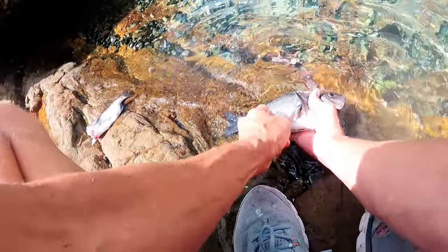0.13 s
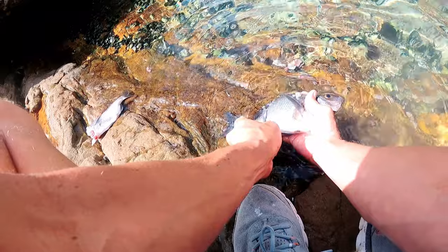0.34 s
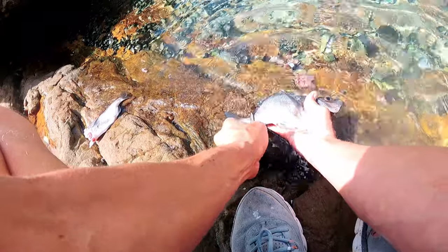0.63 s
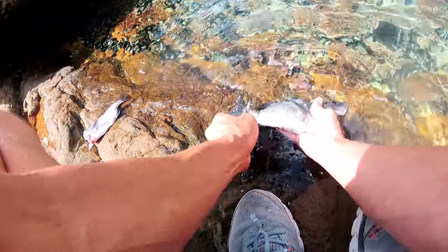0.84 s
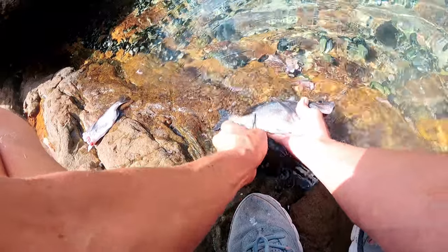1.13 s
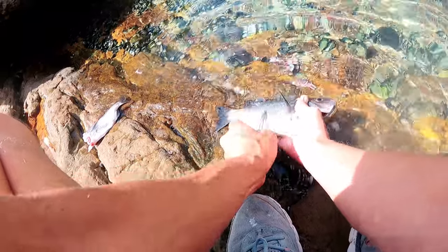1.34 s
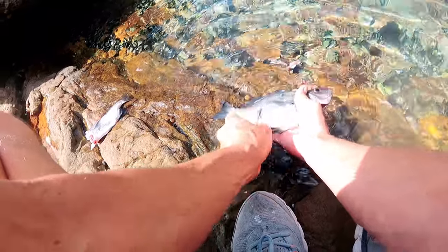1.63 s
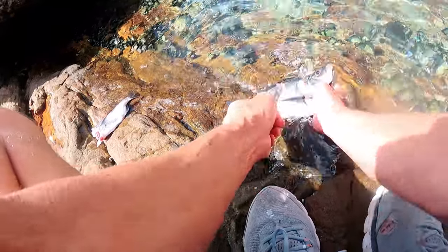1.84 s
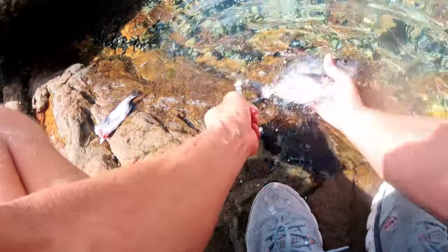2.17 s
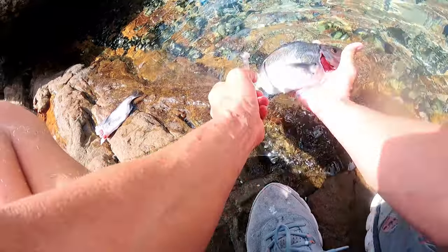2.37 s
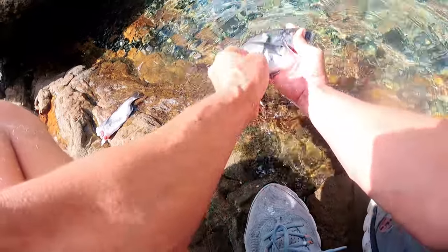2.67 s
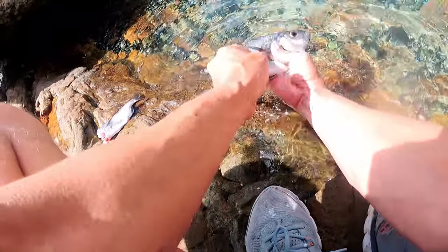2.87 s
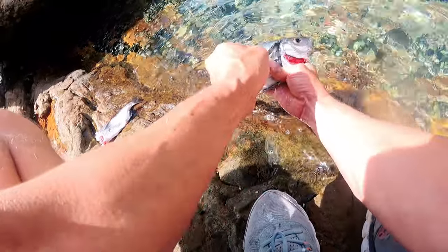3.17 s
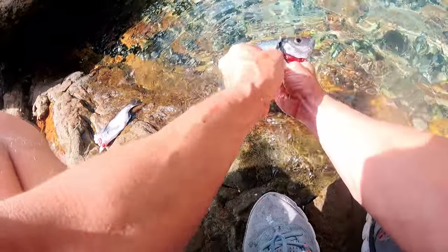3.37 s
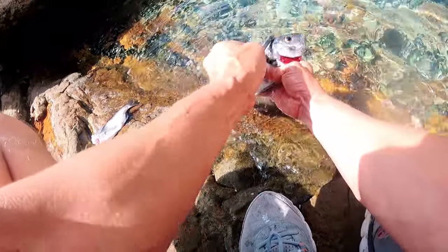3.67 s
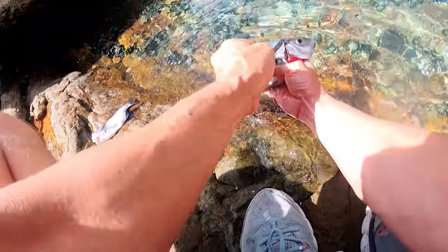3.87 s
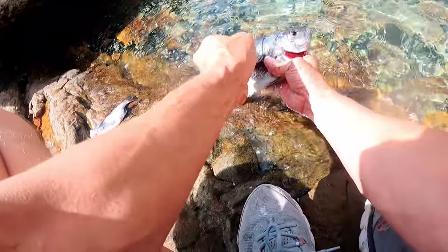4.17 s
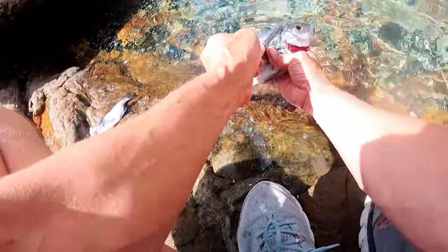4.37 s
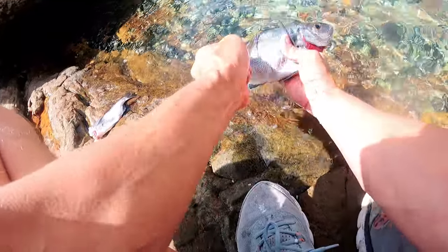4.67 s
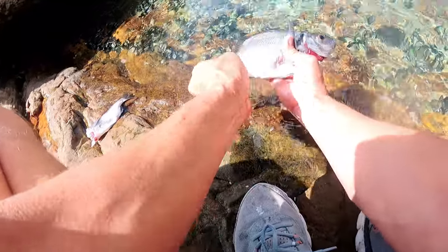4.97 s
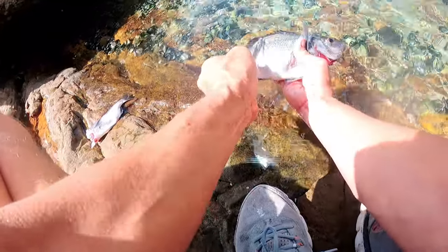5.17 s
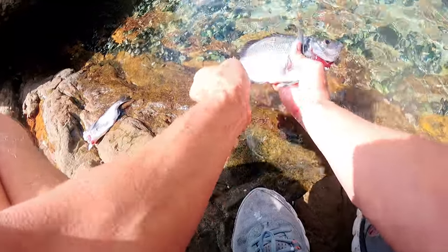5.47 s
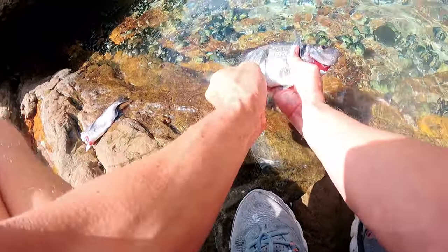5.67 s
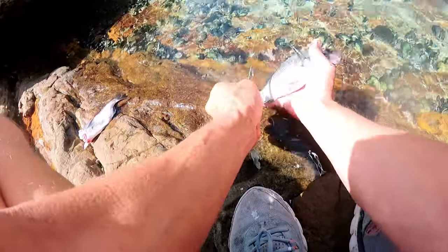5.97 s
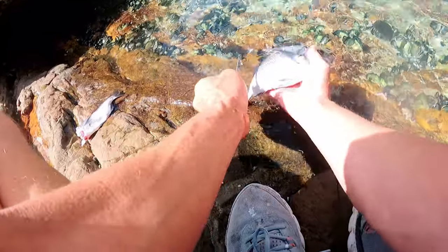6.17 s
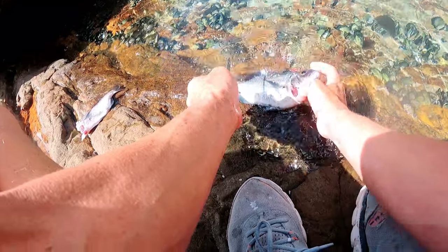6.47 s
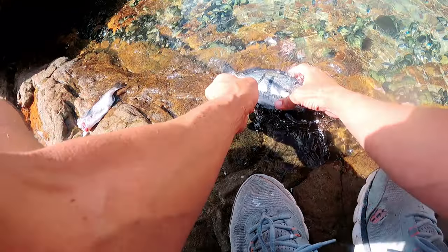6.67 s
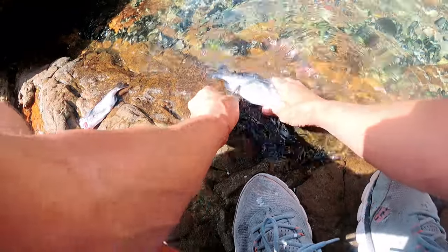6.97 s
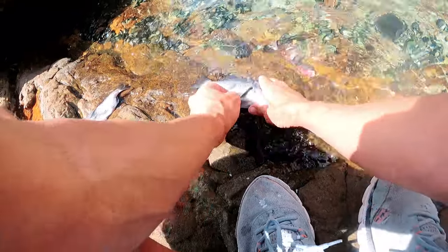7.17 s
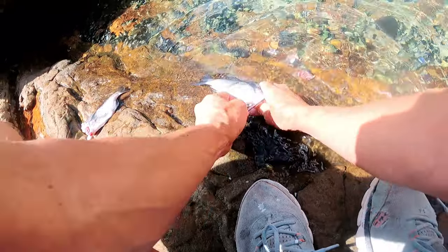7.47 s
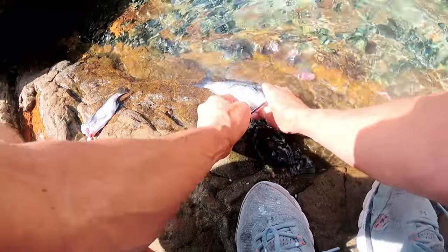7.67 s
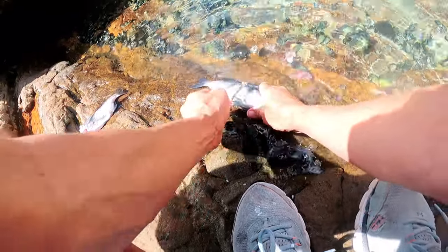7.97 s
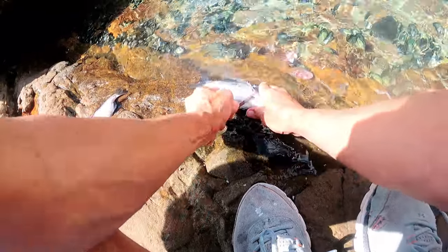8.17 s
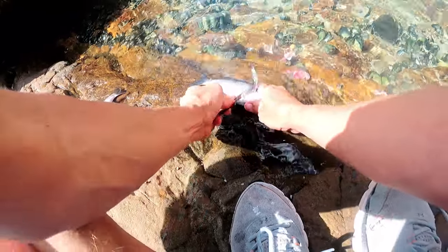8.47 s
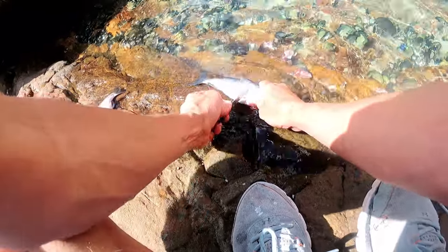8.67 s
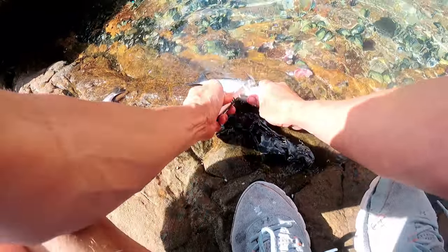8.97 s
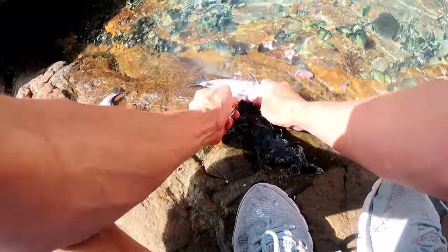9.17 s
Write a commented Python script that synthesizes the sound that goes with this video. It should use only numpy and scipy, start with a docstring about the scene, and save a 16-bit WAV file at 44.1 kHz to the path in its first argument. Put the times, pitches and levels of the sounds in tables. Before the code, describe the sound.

From the start, a small knife scrapes scales off a fish close to the microphone, about four strokes a second. Each stroke is a crackly rasp of tiny snaps, and single scales flick off with sharp ticks. At about 2 seconds the fish is rinsed in the sea, slightly to the right, with a sharp smack, splashing, ringing bubbles and thinning drips. Scraping resumes from 3 to 6 seconds. Around 6.5 seconds comes a second, louder splash with sloshing, plops and drops, then a dull low thump just after 7. From about 7.4 seconds to the end, just past 9, the strokes are softer and wetter, down at the water, with one tiny squeak, and the sound narrows toward the centre. Throughout, the sea washes and trickles softly among shore rocks, while low rumble and occasional wind puffs buffet the microphone.

```python
"""A small knife scrapes the scales off a fish, about four strokes a second, close to the microphone.
Each stroke is a run of tiny snaps that ring in blade and fish; single scales flick off.
The fish is rinsed twice in the sea, a little to the right (splash, slosh, drips, ringing bubbles),
then scraped low at the water, where the stereo image narrows. Behind it the sea washes a rocky shore,
and a low rumble and puffs of wind lie on the microphone's two ports."""
import sys
import numpy as np
from scipy import signal
from scipy.fft import rfft, irfft, next_fast_len
from scipy.io import wavfile

SR = 44100
rng = np.random.default_rng(int(sys.argv[2]) if len(sys.argv) > 2 else 0)


def put_to_file(sound):
    """Save the sound as 16-bit audio at rate SR, in the file named by the first command-line argument."""
    columns = np.atleast_2d(sound).T  # one column per channel
    safe = np.clip(columns, -1, 1)
    whole_steps = np.round(safe * 32767)
    wavfile.write(sys.argv[1], SR, whole_steps.astype(np.int16))


N = 410571
TIME = np.arange(N) / SR


# knife strokes, close in front, timed at the hardest bite: bite_s, level_db, ring_db, rise_s, fall_s
STROKES = [(0.018, -40.5, -43.5, 0.062, 0.054), (0.258, -38, -41.5, 0.018, 0.066),
           (0.303, -50, -44, 0.013, 0.022), (0.51, -48, -47, .016, .02), (0.549, -36.5, -37, 0.023, 0.04),
           (0.778, -41.5, -34.5, 0.013, 0.0092), (0.92, -43.5, -51, 0.062, 0.0054),
           (1.116, -36, -40, 0.038, 0.02), (1.358, -36, -41, 0.022, 0.059),
           (1.639, -40.5, -37, 0.036, 0.0062), (1.875, -44.5, -53, 0.04, 0.049),
           (3.069, -44, -50, 0.063, 0.0037), (3.286, -36.5, -50, 0.05, 0.016),
           (3.482, -35.5, -52, 0.018, 0.03), (3.602, -44.5, -67, 0.014, 0.022),
           (3.74, -35.5, -58, 0.026, 0.0094), (3.999, -38.5, -50, 0.036, 0.053),
           (4.225, -37, -45, 0.021, 0.045), (4.462, -38.5, -47, 0.021, 0.041),
           (4.736, -39, -44, 0.035, 0.0052), (4.762, -28, -30.5, 0.0055, 0.0058),
           (4.849, -46.5, -44, 0.0068, .006), (4.973, -31.5, -30, 0.017, 0.0094),
           (5.243, -38.5, -43, 0.023, 0.018), (5.475, -40, -46.5, 0.027, .012),
           (5.7, -42, -55, 0.016, 0.06), (5.956, -55, -54, 0.014, 0.026), (7.422, -42, -48, 0.0056, 0.0035),
           (7.589, -44.5, -39.5, 0.033, 0.021), (7.833, -47.5, -47.5, 0.058, 0.025),
           (7.987, -53, -50.5, 0.02, 0.031), (8.042, -49, -50, 0.0089, 0.018),
           (8.319, -49, -44.5, 0.022, 0.054), (8.595, -49.5, -42, 0.051, 0.054),
           (8.826, -47.5, -46, 0.043, 0.048), (9.074, -46, -44, 0.035, 0.042),
           (9.296, -53, -50.5, 0.009, .087)]
# colour of the snapping scales, fish held up or lying in the water: frequency_hz, held_db, lowered_db
RASP_COLOUR = [(300, 4.5, 16.5), (960, 10.5, 13), (2380, 1.5, -42), (2870, 5, 14.5), (3420, 1, 1),
               (4500, 5, -2), (6850, -1, -4), (7660, 1.5, 9), (8100, -2.5, 5), (9000, 2, -4),
               (10400, -3.5, 0.5), (11900, -5, -2), (14200, -12, -2), (15700, -18, -19)]
# resonances of flesh, then knife, with the fish held up: pitch_hz, width_hz
HELD_BODY = [(1100, 2800), (4150, 640)]
# the same two, lower once the fish lies in the water: pitch_hz, width_hz
LOWERED_BODY = [(650, 640), (3600, 3800)]
# each grip gives the belly another hollow ring: flesh_db, knife_db, belly_db, belly_hz, belly_width_hz
GRIPS = [(-13, -23, 0.5, 2000, 520), (-19, -9, 2, 2050, 290), (-4, -6.5, 3, 2050, 280),
         (-11, 5.5, -1, 1730, 160), (-5, 0, -4, 1090, 250), (-31, 2, -4, 2850, 400),
         (-12, -0.5, -9, 2200, 1000), (-15, -2, -5, 2300, 1300), (-5, -2, -0.5, 2160, 1500)]
# when each grip begins: start_s
GRIP_STARTS = (-1, .7, 1.5, 2.5, 4.6, 5.1, 7.2, 8.2, 8.95)
LOWERED_S = 7.2  # from here on the fish lies in the water

def scrape(snaps_per_s=2100, catches_per_s=130, spread_db=1.7, slip_db=3.0, rasp_db=3.0, body_db=-1,
           catch_db=-3, crunch_db=-3, push_db=-5, belly_fade_s=0.029, detune_octaves=0.06, apart=0.3):
    """The blade trips over rows of scales: uneven runs of snaps, heard directly and through the body."""
    out, t = np.zeros((2, N)), np.arange(-SR // 5, SR // 5) / SR
    for s, db, ring_db, rise, fall in STROKES:
        lowered = s > LOWERED_S
        flesh_db, knife_db, belly_db, *belly = GRIPS[np.searchsorted(GRIP_STARTS, s) - 1]
        force = swell(t, rise, fall)
        bite = force * amp(slip_db * wander(len(t), 255.5))
        catches = amp(catch_db) * crackle(len(t), catches_per_s, spread_db)  # stiff scales snap hard
        snaps = crackle(len(t), snaps_per_s, spread_db)
        drive = bite * (snaps + catches + .2 * rng.standard_normal(len(t)))
        # each scale that tears loose rings briefly at a pitch of its own
        crunch = unit(bite * patter(1900, 6000, 14500, cycles=22, spread_db=3, size=len(t)))
        rasp = [(hz, low if lowered else held) for hz, held, low in RASP_COLOUR]
        sound = amp(db + rasp_db) * colour(unit(drive) + amp(crunch_db) * crunch, rasp)
        # the belly rings as the blade digs in and fades soon after the hardest bite
        digging = (drive + bite * rng.standard_normal(len(t))) * np.exp(-np.maximum(t, 0) / belly_fade_s)
        sound += amp(ring_db + belly_db) * unit(resonate(digging, *belly))
        for (hz, width), share_db in zip(LOWERED_BODY if lowered else HELD_BODY, (flesh_db, knife_db)):
            detuned_hz = hz * 2 ** (detune_octaves * rng.uniform(-1, 1))  # no two grips are quite alike
            sound += amp(ring_db + body_db + share_db) * unit(resonate(drive, detuned_hz, width))
        sound += amp(db + push_db) * unit(resonate(drive, hz=390, width_hz=280))  # the flesh gives
        scatter = apart * amp(db) * colour(bite * crackle(len(t), snaps_per_s, spread_db), rasp)
        for channel, sign in zip(out, (1, -1)):
            add(channel, s + t[0], np.sqrt(np.mean(force ** 2)) * (sound + sign * scatter))
    return out


# single scales flicking off the blade: start_s, level_db, pitch_hz
SCALE_FLICKS = [(0.0623, -24.5, 8960), (0.074, -26.5, 4300), (0.2523, -22, 7200), (0.275, -25, 8900),
                (0.533, -24, 8500), (0.5427, -12.5, 8840), (0.5794, -19, 6400), (0.6635, -30, 8900),
                (0.826, -35, 9000), (0.889, -42, 9000), (0.9178, -27, 6650), (0.9747, -35, 7000),
                (1.0783, -14.5, 7300), (1.104, -14, 8400), (1.119, -13.5, 9930), (1.129, -23, 11000),
                (1.3508, -15, 9700), (1.3848, -24, 4230), (1.3617, -12, 9270), (1.4015, -18, 4840),
                (1.408, -17, 4030), (1.51, -27, 7000), (3.0686, -12.5, 7300), (3.2443, -17.5, 4200),
                (3.2911, -16, 6500), (3.6022, -20.5, 6960), (3.676, -18, 6500), (3.7386, -16, 6700),
                (3.7765, -21, 6300), (3.785, -19.5, 6840), (4.0514, -24, 5700), (4.1868, -19.5, 4120),
                (4.1983, -22, 4300), (4.2193, -24, 4600), (4.403, -31, 4300), (4.4595, -34, 4700),
                (4.522, -22.5, 4900), (4.7358, -13.5, 4020), (4.7572, -17, 3780), (4.766, -21, 10200),
                (4.9763, -17, 3840), (4.981, -32, 9700), (5.2508, -20.5, 5840), (5.6988, -22, 8450),
                (7.4211, -26, 4650), (7.424, -25, 10000), (7.5617, -28, 9300), (7.594, -29, 10600),
                (7.785, -35, 9100), (7.8137, -35, 4130), (8.318, -23, 7770), (8.569, -32, 3300),
                (8.785, -33, 3260), (8.846, -33, 7660), (9.047, -34, 2520), (9.098, -33, 7740)]
# single drops striking the water nearby: start_s, level_db, pitch_hz
WATER_DROPS = [(0.632, -17, 2160), (.6642, -32, 1980), (1.9828, -18, 2210), (1.9965, -16.5, 4060),
               (2.0066, -23, 4600), (2.0685, -25, 2290), (2.0905, -18.5, 3720), (2.1189, -20, 4040),
               (2.2741, -29, 2000), (2.341, -24, 2880), (2.3534, -29, 3400), (2.3785, -27, 2850),
               (2.3913, -27, 5200), (2.4105, -22.5, 2200), (2.441, -22, 2620), (2.476, -30, 7400),
               (2.489, -24, 5740), (2.494, -25.5, 7870), (2.5366, -31, 4030), (2.545, -31, 4570),
               (2.661, -30, 4320), (2.7062, -23, 4160), (2.731, -26, 3920), (2.7612, -28, 6200),
               (2.7953, -28, 3050), (2.8707, -21.5, 3990), (2.8928, -30, 2170), (2.912, -30, 2500),
               (2.9667, -26, 3550), (3.108, -19, 3510), (3.126, -23.5, 3750), (3.172, -30, 3400),
               (3.3507, -21.5, 3930), (3.5135, -29, 3850), (3.6685, -26, 4240), (5.049, -26.5, 4550),
               (5.157, -21, 3200), (5.8995, -31.5, 4400), (6.1788, -30.5, 4930), (6.217, -29.5, 3700),
               (6.409, -20, 3950), (6.45, -13.5, 4250), (6.463, -20, 4900), (6.4822, -17, 3560),
               (6.4929, -24, 4100), (6.5388, -24, 4700), (6.565, -19, 4800), (6.5912, -22, 5630),
               (6.6287, -24, 2660), (6.641, -30, 5600), (6.7168, -20, 5100), (6.7424, -7.5, 2240),
               (6.7611, -20, 4600), (6.7783, -14, 2570), (6.8115, -21.5, 4670), (6.828, -25, 2920),
               (6.8445, -33, 4500), (7.017, -30, 2300), (7.043, -28, 2230)]

def ticks(rows, gain_db, pan_db, ring_s, crack, crack_s, attack_s, glide_octaves):
    """A scale or a drop strikes: a dry crack and a brief ring whose pitch slides a little."""
    out, t = np.zeros(N), np.arange(SR // 25) / SR
    for s, db, hz in rows:
        crack_colour = [(500, -16), (hz * 1.06, -4), (hz, 0), (max(hz * 1.28, 8000), -8), (15500, -24)]
        burst = noise(crack_colour, len(t)) * np.exp(-t / crack_s)
        slide = glide_octaves * rng.uniform(-0.86, 1) * (1 - np.exp(-t / (2 * ring_s)))
        ring = np.sin(2 * np.pi * np.cumsum(hz * 2 ** slide) / SR) * np.exp(-t / ring_s)
        tick = (ring + crack * burst) * (1 - np.exp(-t / attack_s))
        add(out, s, amp(db + gain_db) * tick / abs(tick).max())
    return pan(out, pan_db)


# the blade presses the wet flesh, down at the water: crest_s, level_db, pitch_hz, rise_s, fall_s
PRESSES = [(8.315, -39, 440, .012, .04), (8.572, -32, 413, 0.013, 0.023), (8.817, -31.5, 406, 0.013, 0.029),
           (9.052, -27.5, 418, .005, 0.048), (9.3, -31.5, 402, 0.013, .03)]
# the blade squeaks on the wet skin: crest_s, level_db, pitch_hz, rise_s, fall_s
SQUEAKS = [(8.606, -33, 3650, .004, .003), (8.612, -20.5, 3300, 0.0018, 0.0031),
           (8.624, -38, 3350, .003, .009)]

def judder(rows, slips_per_s, width_hz, spread_db):
    """The blade sticks and slips on the wet fish, which answers with one short, broad resonance."""
    out, t = np.zeros(N), np.arange(-SR // 10, SR // 5) / SR
    for s, db, hz, rise, fall in rows:
        force = swell(t, rise, fall)
        rub = unit(resonate(force * crackle(len(t), slips_per_s, spread_db), hz, width_hz))
        add(out, s + t[0], amp(db) * np.sqrt(np.mean(force ** 2)) * rub)
    return out


# rinsing at the sea's edge: crest_s, spray_db, churn_db, gurgle_db, slosh_db, rise_s, fall_s
SURGES = [(2.04, -49, -42, -44, -51, 0.055, 0.16), (2.37, -53, -40, -46, -49, 0.072, 0.056),
          (2.53, -40, -39.5, -60, -41, 0.086, 0.11), (3.06, -44.5, -48, -64, -43, 0.31, 0.1),
          (6.504, -34.5, -32, -34, -28.5, 0.029, 0.095), (6.775, -48, -48, -65, -43, 0.04, 0.13),
          (7.135, -67, -61, -42, -43.5, 0.023, 0.022)]
# colour of the sheet of water sliding round the fish: frequency_hz, level_db
SLOSH_COLOUR = [(150, -13), (400, 16.5), (750, -3), (1250, 10), (1700, -8), (2200, -20), (2700, 2),
                (3300, -9), (5000, -28), (10000, -46), (15000, -70)]

def surges():
    """Stirred water: fine spray, churned bubbles, a low gurgle and the slosh beneath them."""
    fine_drops = patter(430, 3000, 10500, cycles=9, spread_db=4.8)
    spray = 0.8 * fine_drops + 0.31 * noise([(800, -22), (4500, 2), (9000, 3), (15000, -28)])
    churn = patter(620, 648, 2900, cycles=14, spread_db=4.1)
    gurgle = patter(70, 430, 1050, cycles=20, spread_db=2)
    slosh = noise(SLOSH_COLOUR) * amp(2.9 * wander(N, 120))
    out = np.zeros(N)
    for s, *levels_db, rise, fall in SURGES:
        stirred = sum(amp(db) * layer for db, layer in zip(levels_db, (spray, churn, gurgle, slosh)))
        out += swell(TIME - s, rise, fall) * stirred
    return out


# large air pockets in the water close by: start_s, level_db, pitch_hz, glide_octaves, life_s
AIR_POCKETS = [(.632, -31, 2170, -0.9, 0.011), (1.405, -29, 800, 1.1, 0.037),
               (1.823, -17.5, 1127, 0.47, 0.014), (1.836, -29, 1430, 0.5, 0.025),
               (1.992, -23, 1340, -1.3, 0.015), (2.009, -16, 620, 0.11, 0.004),
               (2.072, -22, 1234, -0.28, 0.021), (2.136, -14.5, 382, 0.15, 0.02),
               (2.236, -24.5, 1450, 0.1, 0.016), (2.246, -23, 407, -0.04, 0.033),
               (2.248, -27.5, 580, 0.2, 0.041), (2.275, -27, 1430, 0.05, 0.0072),
               (2.309, -32, 1280, 0.2, 0.013), (2.331, -22.5, 510, 0.21, 0.024),
               (2.337, -28, 1450, 0.11, 0.013), (2.366, -32, 636, 0.3, 0.04),
               (2.385, -30, 720, 0.27, 0.029), (2.368, -36, 930, 0.16, .016), (2.243, -34, 972, -.04, .04),
               (2.44, -30, 670, -0.3, .018), (2.476, -27, 1055, -0.43, 0.023),
               (2.53, -38, 1140, -.12, .045), (2.645, -31.5, 806, -.05, 0.041),
               (2.662, -33, 1430, -.1, 0.028), (2.405, -30, 990, 0.82, 0.02),
               (2.455, -32, 556, -0.096, 0.039), (2.463, -29, 1110, 0.51, 0.025),
               (2.437, -25.5, 906, 0.75, 0.037), (2.506, -23, 898, 0.31, .028),
               (2.484, -30, 1450, -0.19, 0.013), (2.575, -29.5, 567, -0.053, 0.035),
               (2.581, -21, 894, -0.1, 0.015), (2.591, -27, 1580, 0.1, 0.0066),
               (2.647, -33, 1296, 0.71, 0.023), (2.66, -27, 1590, 0.053, 0.0098),
               (2.69, -31, 611, 0.31, 0.047), (2.932, -30, 1125, -0.069, 0.018),
               (2.781, -20.5, 1179, 0.093, 0.023), (2.976, -15, 990, -0.16, 0.021),
               (3.027, -26.5, 1450, -0.51, 0.02), (3.072, -24, 1300, 0.12, 0.015),
               (3.107, -31, 1430, -.05, 0.013), (3.170, -26.5, 1410, -0.24, 0.011),
               (3.509, -28.5, 1214, 0.11, 0.02), (3.664, -33, 1060, -0.072, 0.03),
               (3.910, -29.5, 1007, -.03, 0.025), (4.003, -32, 833, 0.57, 0.061),
               (4.145, -28, 1160, .09, 0.026), (6.462, -23, 1790, -0.3, 0.0066),
               (6.481, -13.5, 660, -0.76, 0.0073), (6.485, -23, 417, -0.55, 0.014),
               (6.494, -19, 640, 0.23, 0.014), (6.499, -14, 1030, 0.45, 0.012),
               (6.511, -19, 800, -0.049, 0.012), (6.511, -16, 1290, -0.054, 0.0066),
               (6.523, -15.5, 1240, -0.28, 0.012), (6.538, -13, 930, -0.22, 0.007),
               (6.544, -20, 589, 0.81, 0.045), (6.547, -21.5, 2570, -0.012, 0.0094),
               (6.577, -20.5, 1080, 0.64, 0.023), (6.606, -18.5, 878, -0.05, 0.03),
               (6.628, -12, 1307, 0.72, 0.017), (6.631, -9.5, 960, 1.06, 0.034),
               (6.714, -18, 1310, 0.89, 0.013), (6.743, -19.5, 1280, 0.011, 0.006),
               (6.746, -32, 2135, .04, 0.019), (6.815, -31, 1270, -0.22, .014),
               (6.837, -29, 470, 0.4, 0.021), (6.844, -22.5, 1540, 0.19, 0.0037),
               (7.011, -20, 796, -0.0018, 0.0028), (7.040, -16.5, 925, 0.71, 0.041)]

def air_pockets(wobble_db=1.6, splat_db=-12, splat_s=0.0035):
    """Large bubbles ring one by one, each born with a wet splat."""
    out = np.zeros(N)
    for s, db, hz, octaves, life in AIR_POCKETS:
        ring = bubble(hz, octaves, max(life, .003))
        splat = unit(resonate(rng.standard_normal(len(ring)), 0.97 * hz, 1.23 * hz))
        splat *= np.exp(-TIME[:len(ring)] / splat_s)
        add(out, s, amp(db + wobble_db * wander(len(ring), 280)) * ring + amp(db + splat_db) * splat)
    return out


# wind bumping the microphone and blunt knocks at the water: start_s, level_db, pitch_hz, decay_s
THUMPS = [(3.496, -13, 60, .012), (4.922, -19, 77.5, 0.04), (7.121, -15.5, 174.5, 0.021),
          (7.133, -17, 295, 0.0068), (7.134, -16.5, 51.3, 0.023)]

def thumps():
    """Each dull thump is a low tone that swells quickly and dies."""
    out, t = np.zeros(N), np.arange(SR // 5) / SR
    for s, db, hz, decay in THUMPS:
        age = t / max(decay, .004)
        add(out, s, amp(db) * np.sin(2 * np.pi * hz * t) * 2 * age * np.exp(1 - 2 * age))
    return out


def slap(start_s=2.136, level_db=-3.8, crack=0.21):
    """The fish smacks the surface: two very short tones and a crack of noise."""
    out, t = np.zeros(N), np.arange(SR // 5) / SR
    tones = np.sin(2 * np.pi * 4200 * t) + .7 * np.sin(2 * np.pi * 2300 * t)
    smack = tones * np.exp(-t / .0007) * (1 - np.exp(-t / .00018))
    smack += crack * noise([(1000, 0), (8000, 0), (15000, -8)], len(t)) * np.exp(-t / .0006)
    add(out, start_s, amp(level_db) * smack / abs(smack).max())
    return out


# the fish breaks the surface, near the microphone: start_s, level_db, decay_s
SPLASHES = [(1.981, -31.5, 0.028), (2.33, -38, 0.022), (2.4383, -35, 0.004), (2.581, -39, 0.0048),
            (6.452, -37, 0.035), (6.463, -23, 0.0062), (6.4817, -20.5, 0.011), (6.499, -28, .005),
            (6.511, -37, 0.0031), (6.533, -31, .004), (6.539, -30, 0.004), (6.628, -37, 0.002),
            (6.743, -34, 0.005), (6.778, -27, 0.0064), (6.8115, -32, 0.0027)]
# colour of that splatter: frequency_hz, level_db
SPLATTER_COLOUR = [(150, -15), (400, -18), (1200, -3), (1900, 2), (2700, -3), (3400, -5.5), (4800, 2.5),
                   (7000, -12), (10000, -17), (15000, -51)]

def splashes():
    """Water torn by the fish falls back as a dense, quickly dying splatter."""
    out, t = np.zeros(N), np.arange(SR // 5) / SR
    for s, db, decay in SPLASHES:
        splatter = colour(crackle(len(t), per_s=3200, spread_db=3.7), SPLATTER_COLOUR)
        add(out, s, amp(db) * splatter * np.exp(-t / max(decay, .002)))
    return out


def drips(from_s=2.2, until_s=3.9, count=16, thinning=1.6, level_db=-40, spread_db=4.0,
          pitch_hz=1128, spread_octaves=0.37, cycles=24):
    """The lifted fish drips ever more thinly; each drip traps air that rings at a nearly steady pitch."""
    out = np.zeros(N)
    for k, (when, size, pitch) in enumerate(rng.random((count, 3))):
        s = from_s + (until_s - from_s) * ((k + when) / count) ** thinning
        hz = pitch_hz * 2 ** (spread_octaves * (2 * pitch - 1))
        plop = bubble(hz, octaves=0.09, life_s=cycles / hz)
        add(out, s, amp(level_db + spread_db * (2 * size - 1)) * plop)
    return out


# faint hiss once the fish lies in the water: time_s, level_db
HISS_LEVEL = [(7.1, -87), (7.5, -65), (8.2, -70), (8.45, -56), (8.95, -57.5), (9.31, -67)]
# resonances that colour it: pitch_hz, width_hz, level_db
HISS_RINGS = [(3370, 3000, -4), (4640, 780, -10), (7400, 670, -11)]

def wet_hiss():
    """A thin hiss with a faint ring joins the late strokes."""
    bands = (amp(db) * unit(resonate(rng.standard_normal(N), hz, width)) for hz, width, db in HISS_RINGS)
    return level(HISS_LEVEL) * sum(bands)


def rock_echoes(x, echo_db=-14, decay_s=0.017):
    """Short scattered reflections from stones and legs, different on each side."""
    t = np.arange(SR // 10) / SR
    taps = rng.standard_normal((2, len(t))) * (rng.random((2, len(t))) < .06)
    taps *= np.exp(-t / decay_s) * (t > .002)
    taps /= np.linalg.norm(taps, axis=1, keepdims=True)
    return amp(echo_db) * signal.oaconvolve(x[None], taps, axes=1)[:, :N]


# the sea along the shore, behind the knife: time_s, level_db
WASH_LEVEL = [(0, -42), (1.9, -39.5), (2.6, -39.5), (3.5, -41), (4.2, -39.5), (4.7, -44), (6.4, -39.5),
              (7.2, -43.5), (8.2, -51.5), (9.31, -47.5)]
# colour of the wash: frequency_hz, level_db
WASH_COLOUR = [(300, -18), (700, 4.5), (1050, 6.5), (1600, -3.5), (2200, -3), (3200, -8), (3900, -10),
               (4500, -7.5), (5300, -14), (6400, -16), (7100, -13.5), (7800, -14), (8700, -18),
               (11000, -26), (15000, -34)]

def shore(trickle_db=-11, apart=0.13):
    """A soft wash with water trickling between the stones, as mid and side."""
    wash = noise(WASH_COLOUR) * amp(1.6 * wander(N, 25))
    trickle = patter(400, 900, 6500, cycles=8, spread_db=3.5)
    side = apart * noise(WASH_COLOUR)
    return level(WASH_LEVEL) * np.array([0.58 * wash + amp(trickle_db) * trickle, side])


# rumble right on the microphone: time_s, deep_db, flutter_db
RUMBLE_LEVEL = [(0, -29, -29), (1.9, -25, -27.5), (2.9, -26.5, -28), (4.2, -26, -29), (4.75, -28, -29.5),
                (5.2, -21, -30), (6.1, -28, -30), (7.05, -28.5, -30.5), (7.55, -34.5, -31.5),
                (8.3, -28.5, -31), (9.31, -31.5, -31)]
# colour of the deep part common to both ports: frequency_hz, level_db
DEEP_COLOUR = [(10, -15), (25, -5.5), (45, 0), (62, -1), (80, 3), (100, -1), (135, -9), (200, -14.5),
               (400, -88)]
# colour of the deep part that differs between them: frequency_hz, level_db
DEEP_SIDE_COLOUR = [(10, 14), (25, 5), (60, -36), (120, -28), (400, -31)]
# colour of the flutter above it: frequency_hz, level_db
FLUTTER_COLOUR = [(50, -11), (120, 0), (190, 0), (260, -6), (400, -10.5), (520, -18), (700, -28.5),
                  (1000, -35), (2000, -42.5), (6000, -84)]
# single deep buffets: crest_s, level_db, half_length_s
BUFFETS = [(3.49, -29, 0.028), (4.487, -18.5, 0.064), (4.61, -15, 0.035), (4.897, -16.5, 0.1),
           (5.28, -17.5, 0.029), (6.857, -15, 0.012), (7.145, -22.5, 0.1), (8.378, -23, 0.022),
           (8.865, -21, 0.053)]

def rumble(deep_db=-1.5, deep_apart=0.029, flutter_apart=0.009):
    """Low buffeting on the microphone with a flutter above it, as mid and side."""
    deep = np.array([noise(DEEP_COLOUR), deep_apart * noise(DEEP_SIDE_COLOUR)])
    flutter = np.array([noise(FLUTTER_COLOUR), flutter_apart * noise(FLUTTER_COLOUR)])
    buffet_power = sum((amp(db) * swell(TIME - s, half, half)) ** 2 for s, db, half in BUFFETS)
    deep_gain = amp(deep_db) * np.sqrt(level(RUMBLE_LEVEL) ** 2 + buffet_power)
    return deep_gain * deep + level(RUMBLE_LEVEL, column=2) * flutter


# wind catching one port of the microphone: crest_s, level_db, half_length_s, left_minus_right_db
PUFFS = [(1.603, -24, 0.13, 20), (2.55, -24, 0.1, 11), (3.487, -21, 0.18, -16), (3.87, -23, 0.078, -9),
         (5.753, -27, .06, 16), (6.864, -27, .08, 18), (7.13, -19, 0.089, 22)]
# colour of that wind: frequency_hz, level_db
PUFF_COLOUR = [(10, 3), (27, 3), (60, -5.5), (130, -8), (220, -12), (500, -51), (2000, -100)]

def wind_puffs():
    """Small gusts flap at one port and hardly touch the other."""
    out, flapping = np.zeros((2, N)), noise(PUFF_COLOUR)
    for s, db, half, pan_db in PUFFS:
        port_gains = amp(db + np.minimum([[pan_db], [-pan_db]], 0))
        out += port_gains * swell(TIME - s, half, half) * flapping
    return out


# the microphone's pair of ports: frequency_hz, left_lead_rad, left_minus_right_db
PORTS = [(30, -0.095, 2), (251, -0.4, 1.2), (870, -0.99, 2.5), (1970, -1.2, 1), (3540, -1.46, 0),
         (4600, -0.45, -1.5), (5400, -0.41, 6.5), (6300, -1.5, -2), (7400, -0.82, 6), (7500, 0.85, -1.5),
         (9300, 0.53, 1.5), (15000, 1, 3.5)]
# the stereo image closes towards the middle: start_s, end_s
NARROWING = (7.27, 7.92)

def ports(x):
    """Sound reaches the two ports with a difference of phase and level, which fades as the image closes."""
    size = next_fast_len(N + 2048)
    hz = np.fft.rfftfreq(size, 1 / SR)
    half_difference = np.exp(.5j * read(PORTS, hz, column=1)) * amp(read(PORTS, hz, column=2) / 2)
    pair = irfft(rfft(x, size) * np.array([half_difference, 1 / half_difference]), size)[:, :N]
    centred = np.interp(TIME, NARROWING, [0, 1])
    return (1 - centred) * pair + centred * x


def bubble(hz, octaves, life_s):
    """A pocket of air rings and dies away; its pitch glides, then levels off."""
    age = np.arange(int(1.6 * life_s * SR) + 8) / (life_s * SR)
    glide = 1.6 * age ** 3 / (0.7 + age ** 3)
    turns = np.cumsum(np.minimum(hz * 2 ** (octaves * glide), SR / 2)) / SR
    ring_down = np.exp(-1.3 * age - 0.55 * age ** 4)
    return np.sin(2 * np.pi * turns) * (1 - np.exp(-turns / 0.33)) * ring_down


def patter(per_s, low_hz, high_hz, cycles, spread_db, pitches=24, size=N):
    """A random patter of small rings of many pitches, at unit level."""
    out = np.zeros(size)
    rings = [bubble(hz, 0.22, cycles / hz) for hz in np.geomspace(low_hz, high_hz, pitches)]
    for when, which, strength in rng.random((int(per_s * size / SR), 3)):
        gain = amp(spread_db * min(-np.log(1 - strength), 3.5))
        add(out, when * size / SR, gain * rings[int(which * pitches)])
    return unit(out)


def crackle(size, per_s, spread_db):
    """A random run of snaps of uneven strength, at unit level."""
    strength = amp(spread_db * np.minimum(rng.exponential(1, size), 3.5))
    return unit((rng.random(size) < per_s / SR) * strength * rng.choice([-1, 1], size))


def swell(t, rise_s, fall_s, shape=1.44):
    """Grows to 1 at t = 0 and dies away; shape 1 is a spike, 2 a bell."""
    span = np.where(t < 0, max(rise_s, .002), max(fall_s, .002))
    return np.exp(-abs(t / span) ** shape)


def wander(size, per_s):
    """A random drift that takes a new direction per_s times a second."""
    knots = rng.standard_normal(4096)
    return np.interp(np.arange(size) * per_s / SR % 4095, np.arange(4096), knots)


def resonate(x, hz, width_hz):
    """A resonance with steep skirts."""
    radius = np.exp(-np.pi * width_hz / SR)
    poles = [1, -2 * radius * np.cos(2 * np.pi * hz / SR), radius * radius]
    return signal.lfilter([1, 0, -1], poles, signal.lfilter([1, 0, -1], poles, x))


def colour(x, points):
    """Filters x by a curve of (Hz, dB), at unit level."""
    size = next_fast_len(len(x))
    gains = amp(read(points, np.fft.rfftfreq(size, 1 / SR)))
    return unit(irfft(rfft(x, size) * gains, size)[:len(x)])


def noise(points, size=N):
    """Noise coloured by a curve of (Hz, dB), at unit level."""
    return colour(rng.standard_normal(size), points)


def read(points, hz, column=1):
    """Reads a column of a spectrum on a log-frequency axis."""
    table = np.array(points, float)
    return np.interp(np.log(hz + 1), np.log(table[:, 0] + 1), table[:, column])


def level(rows, column=1):
    """The gain at every sample along a curve of (s, dB)."""
    table = np.array(rows, float)
    return amp(np.interp(TIME, table[:, 0], table[:, column]))


def add(mix, s, sound):
    """Mixes a sound in at time s."""
    start = int(round(s * SR))
    sound = sound[max(-start, 0):]
    part = mix[max(start, 0):][:len(sound)]
    part += sound[:len(part)]


def pan(x, left_minus_right_db):
    """Places x between left and right by level."""
    return x * amp([[left_minus_right_db / 2], [-left_minus_right_db / 2]])


def amp(db):
    """Decibels to gain."""
    return 10 ** (np.asarray(db) / 20)


def unit(x):
    """Scales x to unit level."""
    return x / np.sqrt(np.mean(x ** 2) + 1e-20)


def scene(water_pan_db=-1.5, late_width=0.27):
    """Knife and fish close in front, the splashing a little to the right, shore and rumble all round."""
    background_mid, background_side = shore() + rumble()
    presses = judder(PRESSES, slips_per_s=700, width_hz=263, spread_db=1.5)
    squeaks = judder(SQUEAKS, slips_per_s=3000, width_hz=1130, spread_db=-3.5)
    knife = scrape() + presses + squeaks
    flicks = ticks(SCALE_FLICKS, gain_db=-3, pan_db=-4, ring_s=0.0025,
                   crack=0.95, crack_s=0.0023, attack_s=0.000094, glide_octaves=0.12)
    water = surges() + air_pockets() + slap() + splashes() + drips()
    drops = ticks(WATER_DROPS, gain_db=-1, pan_db=-3, ring_s=0.0018,
                  crack=0.41, crack_s=0.0016, attack_s=0.00026, glide_octaves=0.3)
    near = knife + flicks + pan(water + thumps(), water_pan_db) + drops
    direct = ports(near + background_mid + wet_hiss())
    around = rock_echoes(near.mean(0)) + np.array([background_side, -background_side])
    left, right = direct + around + wind_puffs()
    mid = (left + right) / 2
    side = (left - right) / 2 * np.interp(TIME, NARROWING, [1, late_width])
    return np.array([mid + side, mid - side])


# the microphone's fading top treble: frequency_hz, gain_db
MICROPHONE = [(9500, 1), (12000, -3.5), (15500, -10)]
BAND_LIMIT_HZ = 15700

def record(dry):
    """The microphone softens the highest treble and cuts it off at the band limit."""
    heard = irfft(rfft(dry) * amp(read(MICROPHONE, np.fft.rfftfreq(N, 1 / SR))), N)
    lowpass = signal.firwin(401, BAND_LIMIT_HZ, window=("kaiser", 9), fs=SR)
    return signal.oaconvolve(heard, lowpass[None], "same")


dry = scene()
out = record(dry)
put_to_file(out)
```